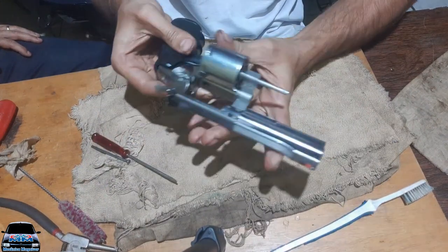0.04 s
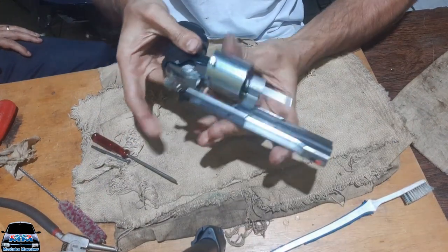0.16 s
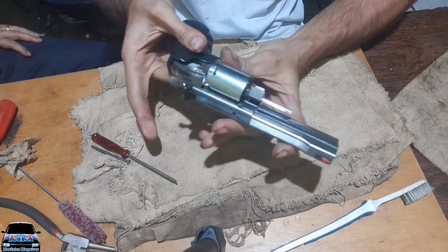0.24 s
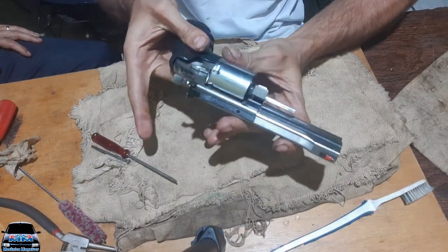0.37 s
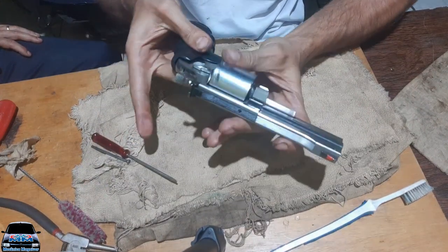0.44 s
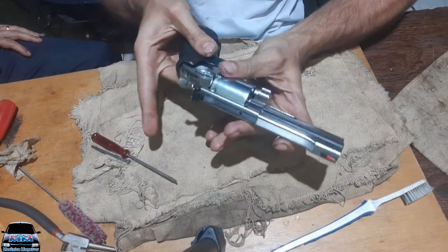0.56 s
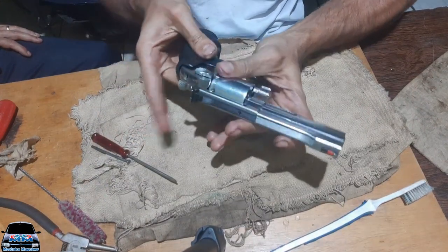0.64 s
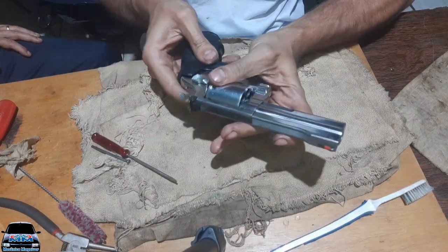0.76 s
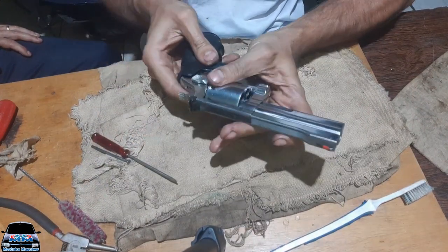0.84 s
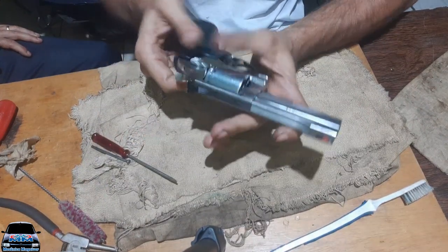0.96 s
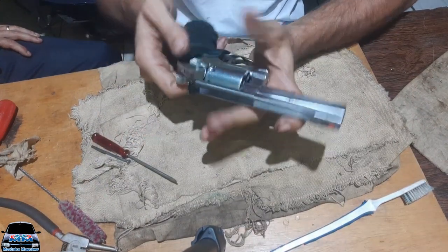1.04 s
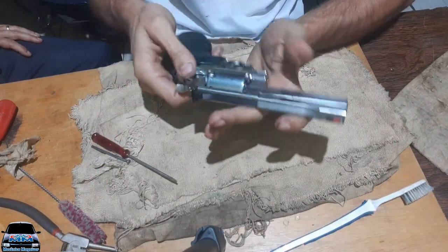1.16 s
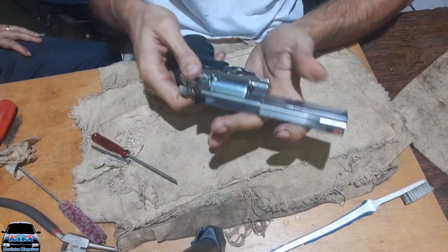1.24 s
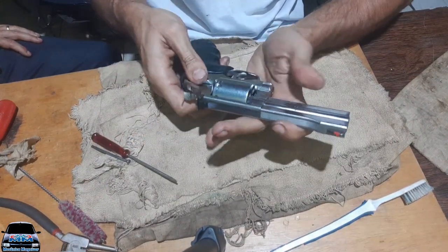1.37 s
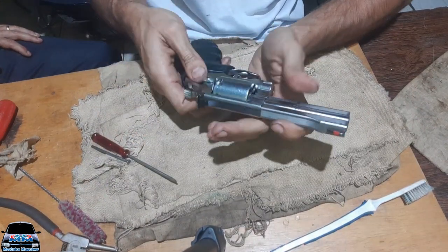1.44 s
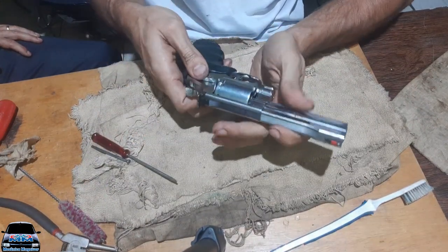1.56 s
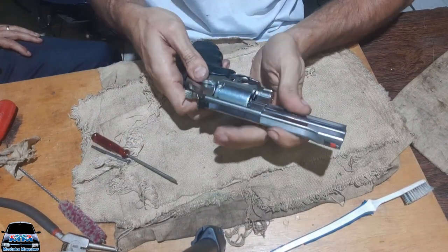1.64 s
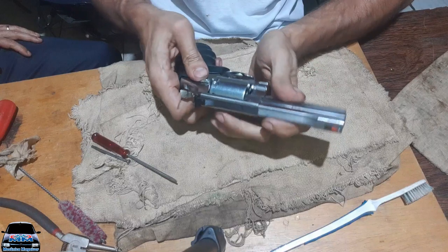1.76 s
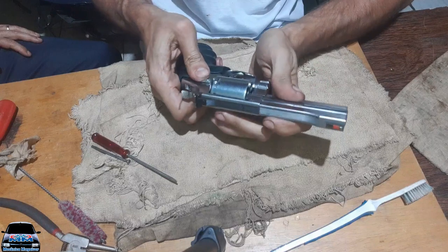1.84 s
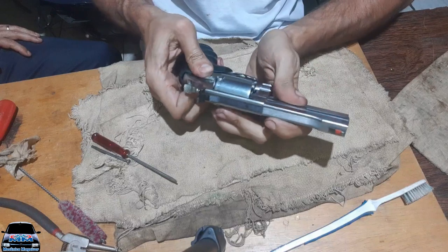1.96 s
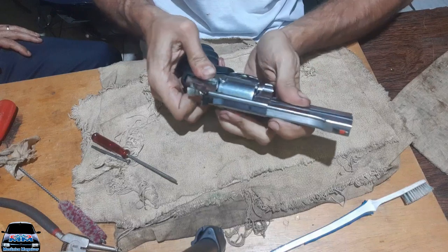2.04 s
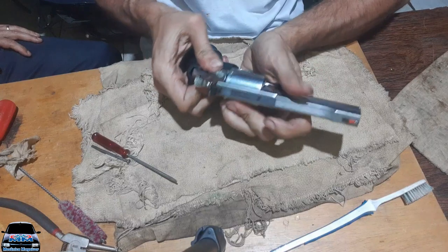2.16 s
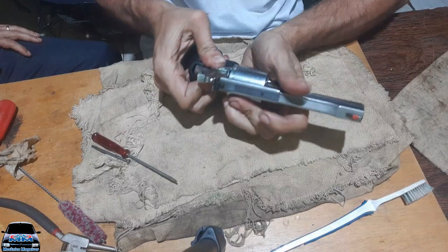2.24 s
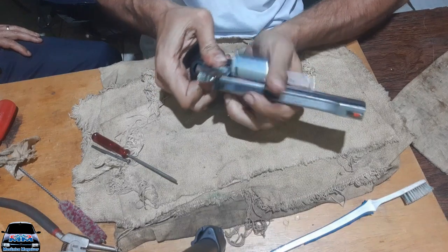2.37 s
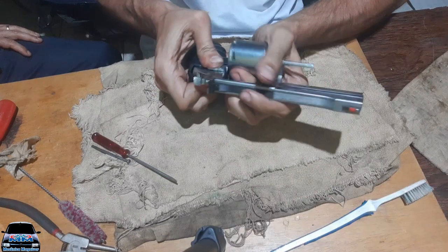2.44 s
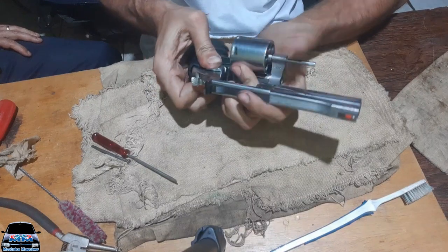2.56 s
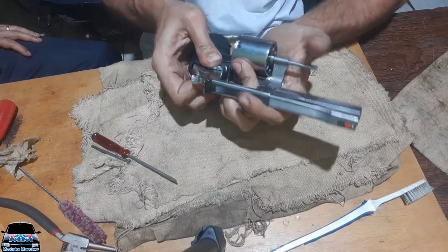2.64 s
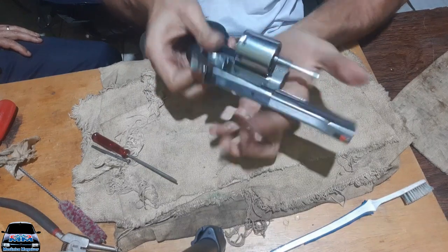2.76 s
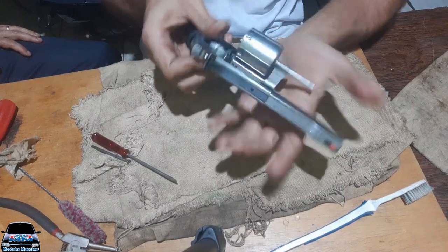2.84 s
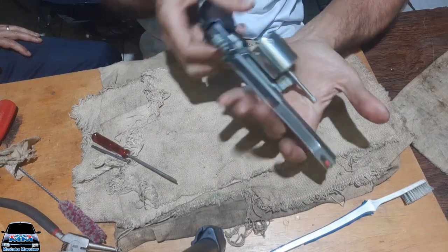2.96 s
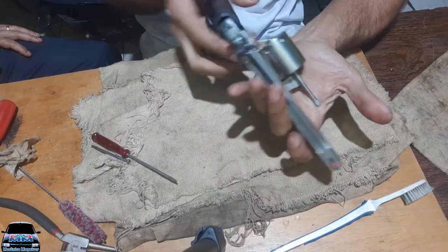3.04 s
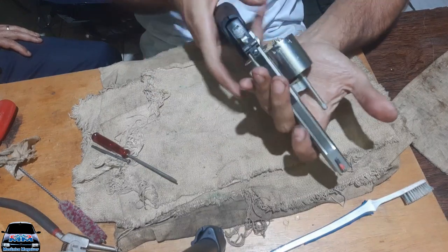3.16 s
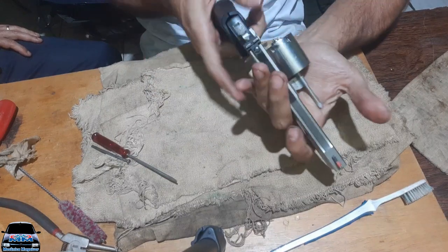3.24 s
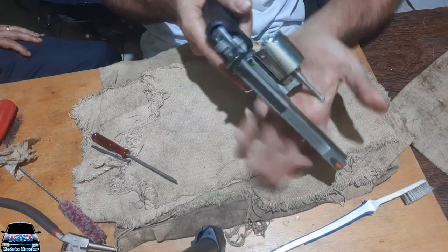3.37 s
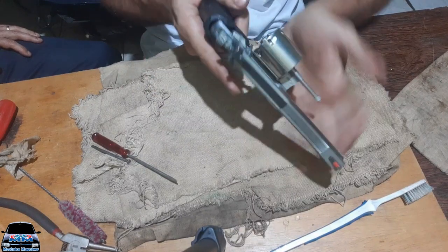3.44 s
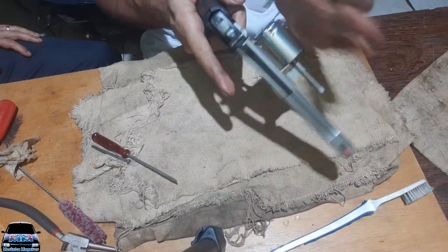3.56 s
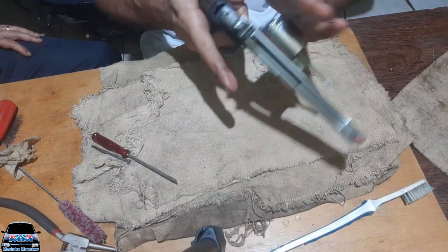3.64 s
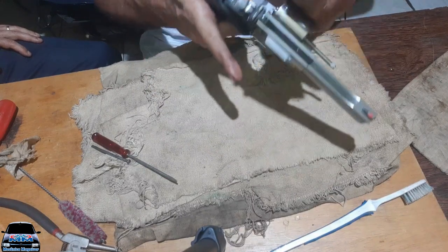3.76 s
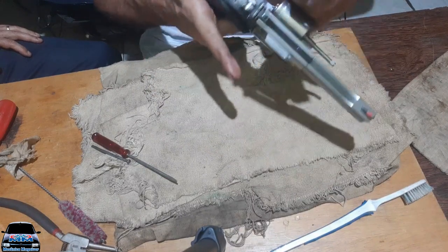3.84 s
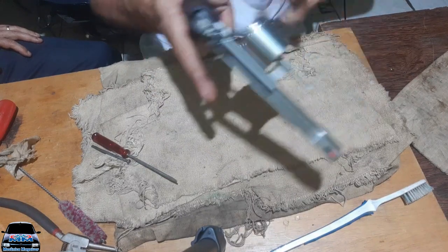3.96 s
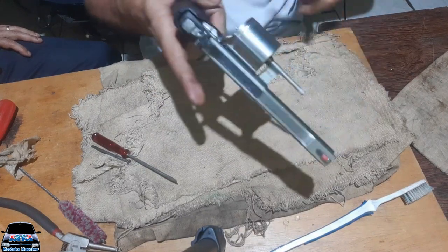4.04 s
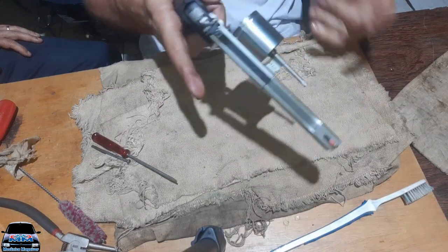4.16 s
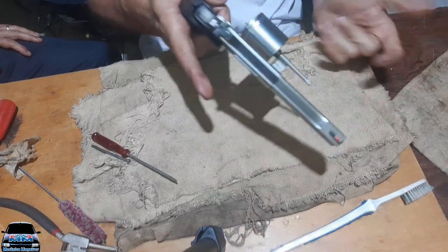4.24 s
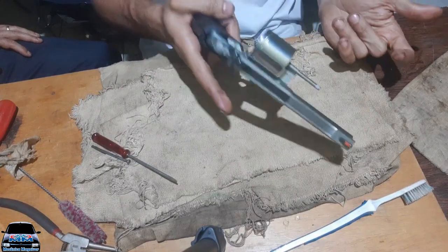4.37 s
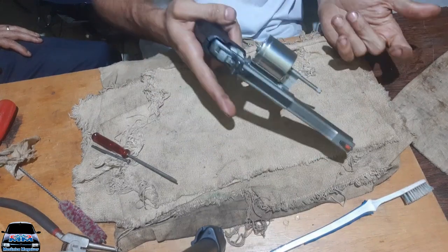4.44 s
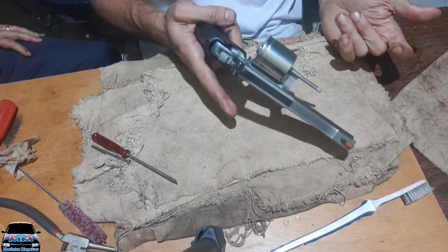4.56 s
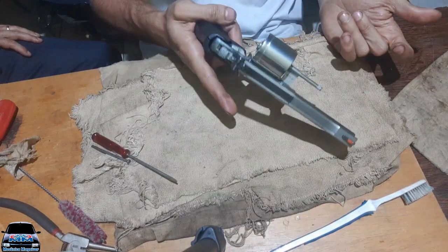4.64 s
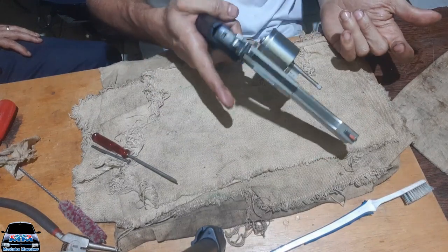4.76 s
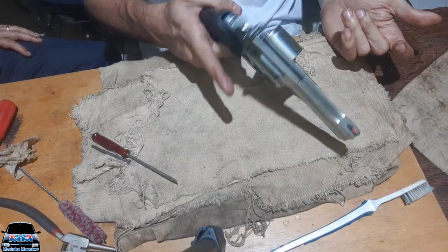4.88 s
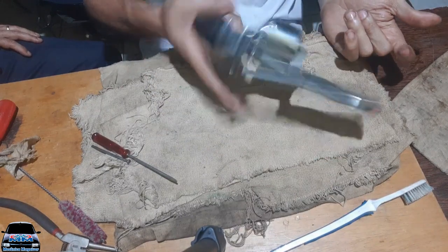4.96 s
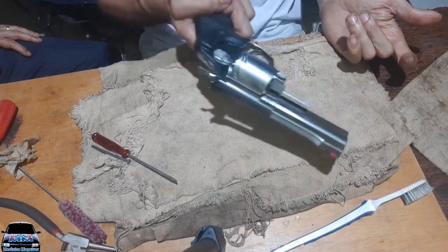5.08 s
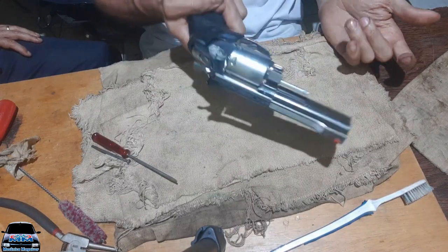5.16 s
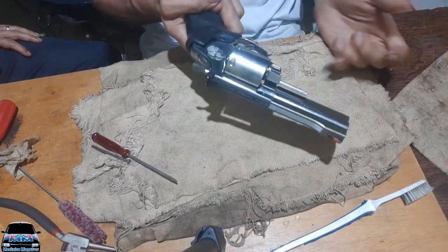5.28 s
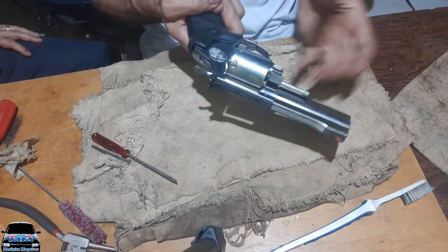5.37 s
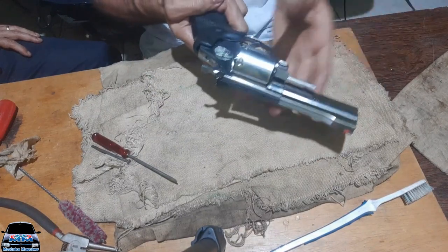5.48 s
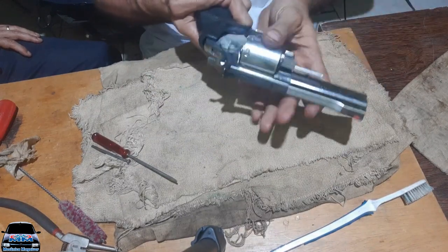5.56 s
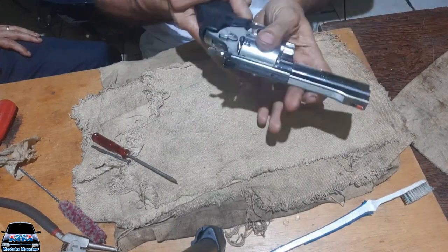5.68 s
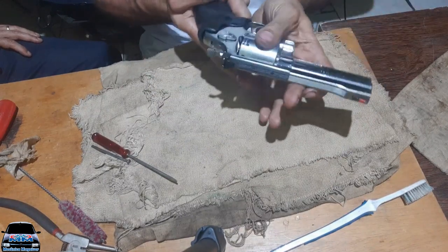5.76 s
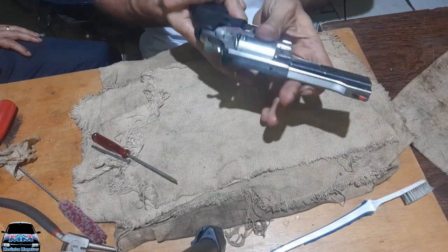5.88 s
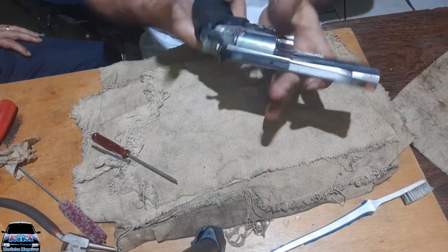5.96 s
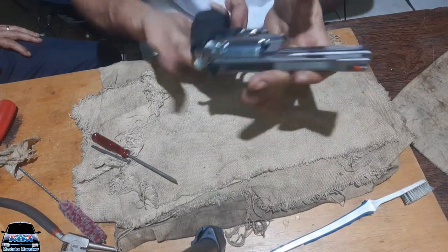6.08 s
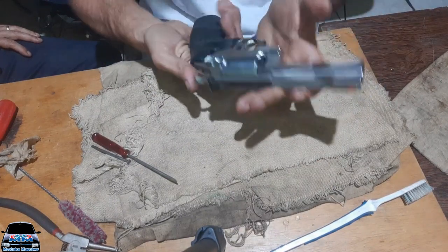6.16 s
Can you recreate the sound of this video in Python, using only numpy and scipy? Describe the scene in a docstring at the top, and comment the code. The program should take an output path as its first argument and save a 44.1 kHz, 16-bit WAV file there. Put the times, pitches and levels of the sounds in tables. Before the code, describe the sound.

A steel revolver is handled close to the microphone in a small, hard-walled room with a very quiet bed of low hum and room noise. At 0.38 s a hard, full metallic clack rings out; at 0.65 s a brighter snap with a slight rattle before it, and at 0.87 s another crisp, trebly one. Then near quiet, with a faint skin rub at 1.2 s, a tiny tick at 1.9 s and barely audible far-off tones. Around 2.51-2.56 s four quickening-in-strength latch ticks end in a clear click, with lighter clinks at 2.7 s. Soft hand bumps and rubs come at 3.55 and 4.4 s, with small double clicks around 4.1 s. At 5.18 s a click precedes the loudest, solid slam at 5.22 s. A bright cluster of clicks falls at 5.80-5.84 s. Snaps are short, with dense echoes fading over about half a second.

```python
"""In a small, hard-walled room, a steel revolver is worked by hand over a cloth-covered bench.
The cylinder snaps shut, indexes, is unlatched, swings out and is flicked shut: bursts of noise ring the frame.
Hands add filtered-noise bumps and grainy rubs, and the walls answer with dense, fading echoes.
Behind lie a low sine hum, coloured room noise and a few faint far-off tones made of narrow noise bands."""
import sys
import numpy as np
from scipy import signal
from scipy.fft import rfft, irfft
from scipy.io import wavfile
from scipy.ndimage import uniform_filter1d

SR = 44100
rng = np.random.default_rng(int(sys.argv[2]) if len(sys.argv) > 2 else 0)


def store_wav(level_fs):
    """Save 16-bit WAV to argv[1]."""
    pcm = np.round(np.clip(np.atleast_2d(level_fs), -1, 1) * 32767)
    wavfile.write(sys.argv[1], SR, pcm.T.astype(np.int16))


N = 274302   # length in samples
TIME = np.arange(N) / SR


def from_db(db):
    """Turn decibels into a gain."""
    return 10 ** (np.asarray(db) / 20)


def rms_one(x):
    """Scale a sound to an average power of one."""
    return x / np.sqrt(np.mean(x ** 2) + 1e-20)


def at_hz(points, hz):
    """Read a table between its points, with pitch spaced by octaves."""
    point_hz, value = np.transpose(points)
    return np.interp(np.log(hz + 1), np.log(point_hz), value)


def add(track, start_s, sound):
    """Mix a sound into a track, cutting it off at the end of the track."""
    first = round(start_s * SR)
    track[..., first:first + sound.shape[-1]] += sound[..., :N - first]


def causal(gain):
    """Give a filter its earliest possible response (minimum phase): nothing sounds before its cause."""
    cepstrum = irfft(np.log(gain + 1e-9))
    half = len(cepstrum) // 2
    # fold the backward half of the response onto the forward half
    cepstrum[1:half] *= 2
    cepstrum[half + 1:] = 0
    return np.exp(rfft(cepstrum))


# how alike the background noise is at the two ears: pitch_hz, correlation (0 to 1)
EAR_LIKENESS = [(60, 0.98), (200, 0.74), (600, 0.45), (1500, 0.058), (5000, 0.033)]


def noise(colour):
    """Coloured stereo noise with an rms of one; the bass is nearly the same in both ears."""
    hz = np.fft.rfftfreq(N, 1 / SR)
    mid, side = rfft(rng.standard_normal((2, N)))
    alike = np.clip(at_hz(EAR_LIKENESS, hz), 0, .99)
    shared = np.sqrt(1 + alike) * mid
    opposite = np.sqrt(1 - alike) * side * [[1], [-1]]
    return rms_one(irfft((shared + opposite) * from_db(at_hz(colour, hz)), N))


def swell(top_s, ebb_s, rise_s=0.22):
    """A smooth rise to a top, then an exponential ebb."""
    age = TIME - top_s
    return np.exp(-(np.minimum(age, 0) / rise_s) ** 2 - np.maximum(age, 0) / ebb_s)


# changing loudness of the mains hum: time_s, level_db
HUM_LEVEL = [(0.0, -70), (0.8, -64.5), (1.4, -66), (1.6, -81), (5.4, -80.5), (6.0, -71)]
# tops of the midrange swells: top_s, level_db, ebb_s
MURK_SWELLS = [(0.7, -63.5, 1.04), (2.85, -64, 0.39), (4.3, -66, 0.22), (5.7, -65.5, 2.6)]
# tone colour of the midrange noise: pitch_hz, level_db
MURK_COLOUR = [(120, -21), (300, -2.5), (500, -3), (900, -6.5), (1500, -11.5), (3000, -19), (8000, -31.5)]
# tone colour of the steady room noise: pitch_hz, level_db
AIR_COLOUR = [(12, -58), (20, -1.5), (107, -1.5), (163, -9), (193, -17.5), (270, -16.5), (310, -20),
              (347, -27), (422, -13), (513, -23.5), (660, -19.5), (1370, -26), (5080, -37), (8890, -33),
              (16000, -56)]


def background(hum_hz=100, murk_rest_db=-72, air_db=-65):
    """Steady room noise, midrange noise that swells and ebbs, and a low sine hum."""
    hum_gain = from_db(np.interp(TIME, *np.transpose(HUM_LEVEL)))
    hum = hum_gain * rms_one(np.sin(2 * np.pi * hum_hz * TIME))
    # the swells add as power to a resting level
    murk_power = from_db(murk_rest_db) ** 2
    for top_s, level_db, ebb_s in MURK_SWELLS:
        murk_power = murk_power + (from_db(level_db) * swell(top_s, ebb_s)) ** 2
    murk = np.sqrt(murk_power) * noise(MURK_COLOUR)
    air = from_db(air_db) * noise(AIR_COLOUR)
    return hum + murk + air


def chatter(t, length_ms, first_blow=3.2, apart=.7, hold=2.3, dying=1.7):
    """Spectrum of a blow and its dense, dying rebounds: broadly flat, a little different at each ear."""
    shared = rng.standard_normal(len(t))
    rebounds = shared + apart * rng.standard_normal((2, len(t)))
    age = t * 1000 / length_ms
    # the parts keep rattling briefly before they settle
    force = rebounds * (1 + hold * age) * np.exp(-dying * age)
    force[:, 0] += first_blow
    spectrum = rfft(force)
    # each ear and their average count towards the power, smoothed over 300 Hz and then flattened
    power = abs(spectrum) ** 2 + abs(spectrum.mean(axis=0)) ** 2
    power = uniform_filter1d(power / 2, int(300 * t[-1]))
    return spectrum * causal(power.mean(axis=0) ** -.5)


# Levels of the contacts below are set before the steel colours them.
# steel parts snap home: start_s, level_db, chatter_ms, body_db (near 2 kHz), treble_db (above 9.5 kHz),
# part_hz (the struck part), part_db, part_width_octaves, left_over_right_db
SNAPS = [ (0.3756, 3.5, 2.77, 1.5, -3.5, 2560, 4.5, 0.39, 0.5),
         (0.6488, -4, 2, -1, 3.5, 6060, 6, 0.16, 0.5), (0.65, -16, 1.3, -2, -2, 8880, 18, 0.089, 5.5),
         (0.8659, -18, 1.8, -12, 13, 8000, 9, .3, 11), (0.8686, -4.5, 1.28, -5, 10, 5750, 4, .12, 1),
         (1.9034, -37.5, 2.1, 5, 4, 6000, 4.5, 0.24, 2), (2.5368, -28.5, 4, 2.5, 6.5, 9600, 12.5, 0.38, 4),
         (2.5573, -12, 1.76, 1.5, -7.5, 3840, 5.5, .15, -3.5), (2.6882, -29, 2, -5, -9, 4560, 1, .4, 2),
         (2.7157, -21, 1.4, 2, 4.5, 6340, 17, 0.33, 2), (4.0895, -18.5, 1.4, 4, -6, 3900, 6, 0.28, 3),
         (4.091, -18.5, 1.6, -1, -7, 7700, 8.5, .18, 0),
         (4.1191, -24.5, 2.6, -3, -12.5, 6440, 4.5, .3, 0.5), (5.1804, -11, 1.8, -3, -11, 7600, 6, 0.11, 2),
         (5.2175, 8.5, 2.3, -2, -1, 1730, 4.5, 0.25, 1), (5.221, -3.5, 1.14, -7.5, -3, 790, 4, 0.18, 4),
         (5.8049, -6.5, 2.8, 2.5, 10.5, 7400, 7.5, 0.12, 6.5), (5.823, -14.5, 4.6, -8, -2, 7000, 5, .3, -2),
         (5.829, -2.5, 2.4, 0, 7, 7260, 4, 0.29, -0.5)]
# the sound of one tick, with the same columns as a snap from chatter_ms on (the sign of the width has no effect)
TICK_SOUND = (3.5, -11, 5.5, 7597, 6, -0.2, 3.5)
# further ticks and rebounds, faint to strong: start_s, level_db
FURTHER_TICKS = [(4.045, -43), (5.2405, -19), (5.8364, -13)]
# short rattling or ringing bursts of steel: start_s, level_db, chatter_ms, ring_hz, ring_db
STEEL_BURSTS = [(0.639, -22.5, 8.8, 1680, 7), (2.575, -33, 24, 3780, 18), (5.2154, -21.5, 2, 6000, 5)]


def contacts(latch_s=2.51, step_s=0.0118, latch_db=-37, grows_db=3.5, ring_octaves=0.13):
    """List every touch of steel: snaps, the latch creeping under the thumb, further ticks and short bursts."""
    # the latch makes four evenly spaced ticks, each louder than the last
    latch = [(latch_s + k * step_s, latch_db + k * grows_db) for k in range(4)]
    ticks = [(start_s, level_db, *TICK_SOUND) for start_s, level_db in latch + list(FURTHER_TICKS)]
    bursts = [(start_s, level_db, chatter_ms, 0, 0, ring_hz, ring_db, ring_octaves, 0)
              for start_s, level_db, chatter_ms, ring_hz, ring_db in STEEL_BURSTS]
    return list(SNAPS) + ticks + bursts


# broad colour of steel on steel: pitch_hz, level_db
STEEL_COLOUR = [(60, -25), (250, -34), (500, -15.5), (800, -5.5), (1100, -4.5), (1500, 1.5), (2500, -3),
                (4200, -0.5), (7500, 0.5), (10000, -4), (12000, -11), (15000, -23.5)]
# ringing pitches of frame and cylinder, and the hollows between (below 0 dB):
# pitch_hz, over_broad_colour_db, fade_s (time to die by 60 dB)
FRAME_MODES = [(795, 1.5, 0.018), (1510, 5, 0.044), (1904, 4.5, 0.06), (2404, 6, 0.045), (2630, 2.5, 0.028),
               (3200, 5.5, 0.02), (3350, -2.5, 0.035), (3700, -1.5, 0.021), (4105, 6.5, .024),
               (4290, 6.5, 0.018), (4900, 1, .015), (5300, 1, 0.032), (5760, 5, 0.015), (6550, -5, .01),
               (6600, -2.5, 0.03), (7630, 4.5, 0.039), (9200, 1.5, 0.012), (10200, 2, 0.042)]
# some stops, hard or soft, also knock hollowly through the grip: start_s, level_db (peak, before fading)
GRIP_KNOCKS = [(0.3756, -43), (0.6488, -40), (0.8686, -49.5), (2.5573, -49), (2.7159, -43.5), (4.1191, -56),
               (5.2175, -48), (5.829, -46.5)]


def revolver(size=8192, body_hz=2000, body_octaves=0.36, treble_hz=9500,
             knock_hz=495, knock_fade_s=0.037, lag_ms=0.036):
    """Every contact rings one frame, tinted by the struck part; some stops add a fading sine knock."""
    out = np.zeros((2, N))
    t = np.arange(size) / SR
    hz = np.fft.rfftfreq(size, 1 / SR) + 1   # kept above zero for the logarithms
    mode_power = 1
    for mode_hz, over_db, fade_s in FRAME_MODES:
        # the faster a ringing pitch fades, the wider its peak
        half_width_hz = np.log(1000) / (2 * np.pi * fade_s)
        mode_power = mode_power + (from_db(over_db) ** 2 - 1) / (1 + ((hz - mode_hz) / half_width_hz) ** 2)
    frame = from_db(at_hz(STEEL_COLOUR, hz)) * np.sqrt(np.maximum(mode_power, .1))
    body = np.exp(-(np.log2(hz / body_hz) / body_octaves) ** 2)
    treble = 1 / (1 + (treble_hz / hz) ** 8)
    # the sound reaches the right ear a little later
    arrival = np.exp(-2j * np.pi * hz * np.array([[0], [lag_ms / 1000]]))
    for start_s, level_db, chatter_ms, body_db, treble_db, part_hz, part_db, part_octaves, left_db in contacts():
        part = np.exp(-(np.log2(hz / part_hz) / part_octaves) ** 2 / 2)
        tint = from_db(level_db + body_db * body + treble_db * treble + part_db * part)
        ears = arrival * from_db([[left_db / 2], [-left_db / 2]])
        ringing = chatter(t, chatter_ms) * causal(frame * tint)
        add(out, start_s, irfft(ringing * ears))
    knock = np.sin(2 * np.pi * knock_hz * t) * np.exp(-np.log(1000) * t / knock_fade_s)
    for start_s, level_db in GRIP_KNOCKS:
        add(out, start_s, from_db(level_db) * knock)
    return out


# how long the room's tail takes to die by 60 dB: pitch_hz, fade_s
ROOM_FADE = [(200, 0.61), (700, 0.32), (1500, 0.77), (4000, 0.65), (8000, 0.6), (14000, 0.25)]
# tone colour of the echoes: pitch_hz, level_db
ROOM_COLOUR = [(100, -4.5), (600, -2.5), (1500, 0), (4000, 1.5), (8000, -4.5), (14000, 1.5)]


def room(x, tail_db=-9.5, first_s=0.0037, early_db=-11.0, early_fade_s=0.087):
    """Dense wall echoes from fading noise: a quick early cluster and a tail whose top treble dies first."""
    t = np.arange(SR) / SR
    hz = np.fft.rfftfreq(SR, 1 / SR)
    white = rfft(rng.standard_normal((2, SR)))
    echoes = 0
    edges_hz = np.geomspace(100, 20000, 37)
    for low_hz, high_hz in zip(edges_hz, edges_hz[1:]):
        centre_hz = np.sqrt(low_hz * high_hz)
        power = 0
        for level_db, fade_s in [(tail_db, at_hz(ROOM_FADE, centre_hz)), (early_db, early_fade_s)]:
            # a slower fade starts lower, so that the total energy follows the level
            start_power = from_db(level_db) ** 2 * np.log(1e6) / (fade_s * SR)
            power = power + start_power * np.exp(-np.log(1e6) * t / fade_s)
        band = irfft(white * (hz >= low_hz) * (hz < high_hz))
        echoes = echoes + band * np.sqrt(power) * from_db(at_hz(ROOM_COLOUR, centre_hz))
    # silence before the first echoes, then a short ramp
    echoes = echoes * np.clip(t / first_s - .5, 0, 1)
    return signal.fftconvolve(x, echoes, axes=1)[:, :N]


# faint far-off tones: start_s, end_s, start_pitch_hz, end_pitch_hz, width_hz (to each side), level_db
FAR_TONES = [(0.646, 0.907, 623, 625, 8.7, -70), (1.313, 1.556, 1273, 1212, 33, -73.5),
             (1.538, 1.832, 1224, 1186, 60, -73), (1.651, 2.038, 491, 461, 33, -71.5),
             (2.606, 2.887, 594, 590, 14, -73.5), (5.483, 5.776, 480, 457, 22, -74)]


def far_tones(fade_s=0.026):
    """Gently gliding tones, smeared by distance: slow noise moves each one's strength and phase."""
    out = np.zeros((2, N))
    t = np.arange(SR) / SR
    for start_s, end_s, start_hz, end_hz, width_hz, level_db in FAR_TONES:
        length_s = end_s - start_s
        pitch_hz = np.interp(t, [0, length_s], [start_hz, end_hz])
        phase = 2 * np.pi * np.cumsum(pitch_hz) / SR
        fade = np.clip(np.minimum(t, length_s - t) / fade_s, 0, 1)
        smear = signal.butter(2, width_hz, fs=SR, output="sos")
        # the first second lets the filter settle
        a, b = signal.sosfilt(smear, rng.standard_normal((2, 2 * SR)))[:, SR:]
        tone = fade * (a * np.cos(phase) + b * np.sin(phase))
        add(out, start_s, from_db(level_db) * tone / np.std(tone[fade > 0]))
    return out


# soft bumps of hand and grip: start_s, level_db, dull_above_hz
HAND_BUMPS = [(3.558, -56, 217), (3.596, -55.5, 227), (4.386, -45.5, 114), (4.421, -49.5, 162)]
# skin sliding on steel: start_s, level_db, length_s
SKIN_RUBS = [(1.203, -62.5, 0.054), (2.226, -70, 0.028), (3.545, -58.5, 0.047), (3.562, -61.5, 0.082),
             (3.732, -67, 0.058), (4.116, -63.5, 0.059), (4.43, -67, 0.035)]
# tone colour of the rubbing: pitch_hz, level_db
SKIN_COLOUR = [(100, 8), (400, -1), (1000, 3), (2000, 2.5), (3000, 0), (4300, -2), (6000, -9), (10000, -10),
               (15000, -32)]


def hands(bump_s=0.022, lowest_hz=48, grain_db=3.5, press_s=0.0025, grip_s=0.0033):
    """Flesh on the grip gives dull, fading low noise; rubbing skin gives short, grainy noise."""
    bumps, pressure = np.zeros(N), np.zeros(N)
    t = np.arange(SR // 4) / SR
    press = 1 - np.exp(-t / press_s)
    for start_s, level_db, dull_hz in HAND_BUMPS:
        force = rng.standard_normal(len(t)) * press * np.exp(-t / bump_s)
        dull = signal.butter(2, [lowest_hz, dull_hz], "band", fs=SR, output="sos")
        thud = signal.sosfilt(dull, force)
        add(bumps, start_s, from_db(level_db) * thud / np.sqrt(np.sum(thud ** 2) / (bump_s * SR)))
    for start_s, level_db, length_s in SKIN_RUBS:
        stroke = (1 - np.exp(-t / grip_s)) * np.exp(-(t / length_s) ** 2)
        add(pressure, start_s, from_db(level_db) * stroke)
    # smoothed noise makes the loudness of the rub uneven
    roughness = rms_one(uniform_filter1d(rng.standard_normal(N), size=90))
    rubbing = rms_one(from_db(grain_db * roughness) * noise(SKIN_COLOUR))
    return bumps + pressure * rubbing


def scene():
    """Revolver and hands close by, with the room around them."""
    behind = background()
    near = revolver() + hands()
    return behind + near + room(near) + far_tones()


def record(dry, rumble_hz=28, cutoff_hz=16000):
    """The microphone thins the deepest rumble; the top is cut steeply."""
    thin = signal.butter(2, rumble_hz, "high", fs=SR, output="sos")
    top_cut = signal.ellip(10, .1, 80, cutoff_hz, fs=SR, output="sos")
    return signal.sosfilt(top_cut, signal.sosfilt(thin, dry))


dry = scene()
out = record(dry)
store_wav(out)
```